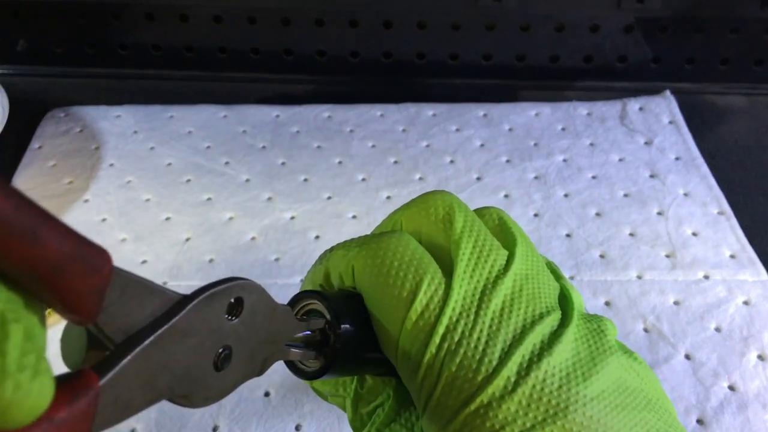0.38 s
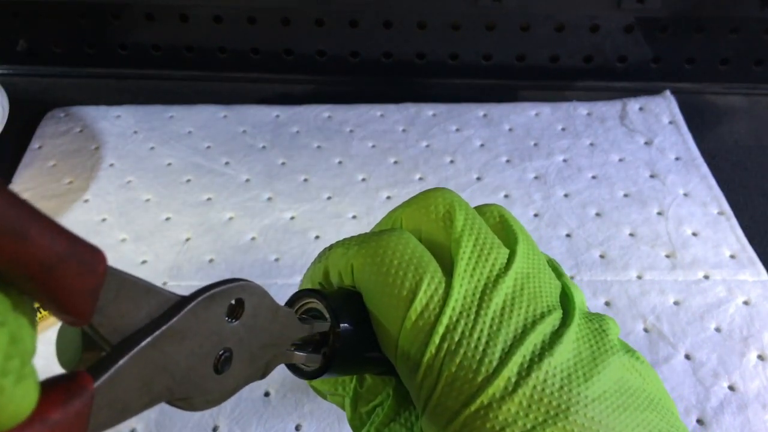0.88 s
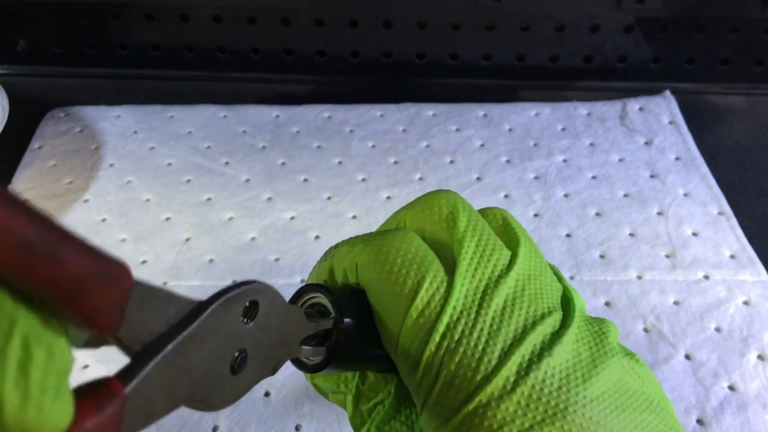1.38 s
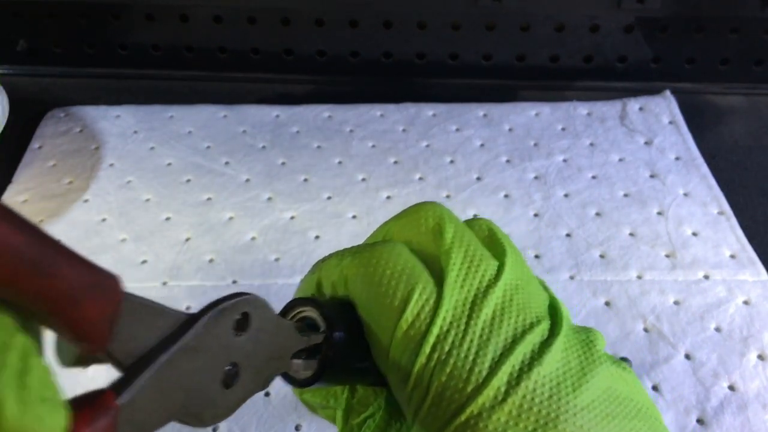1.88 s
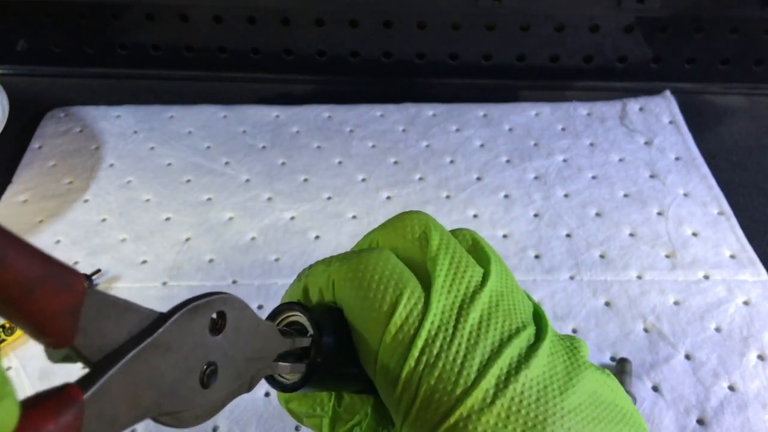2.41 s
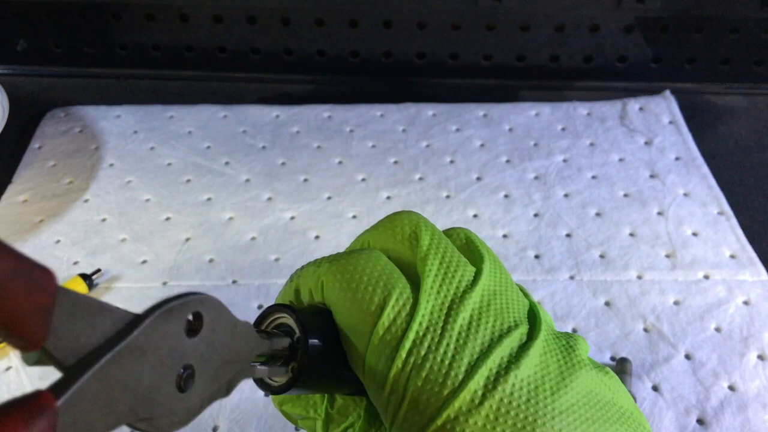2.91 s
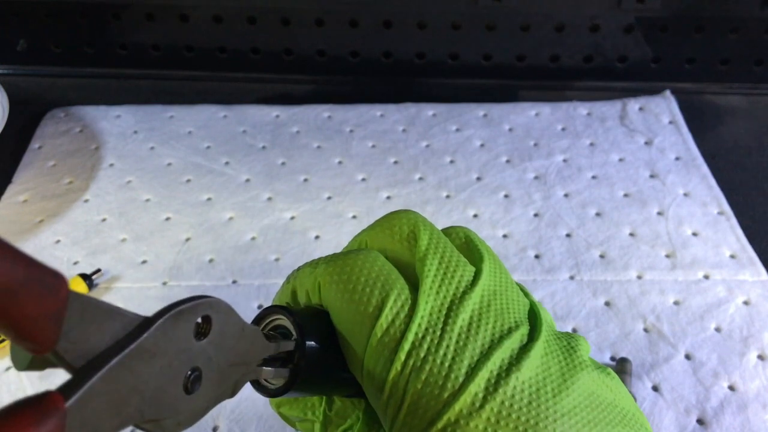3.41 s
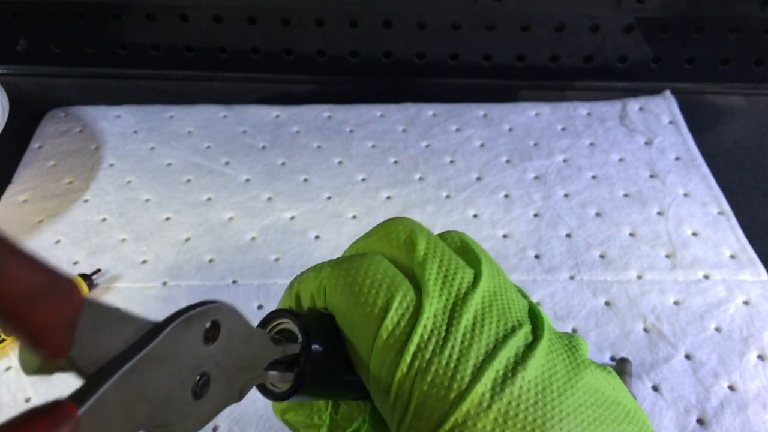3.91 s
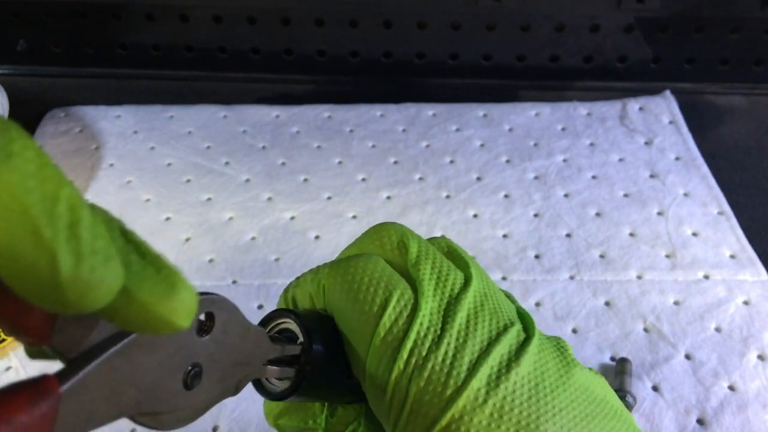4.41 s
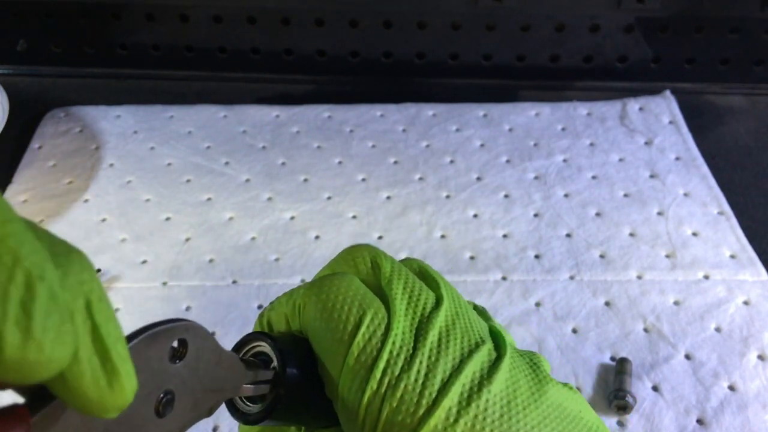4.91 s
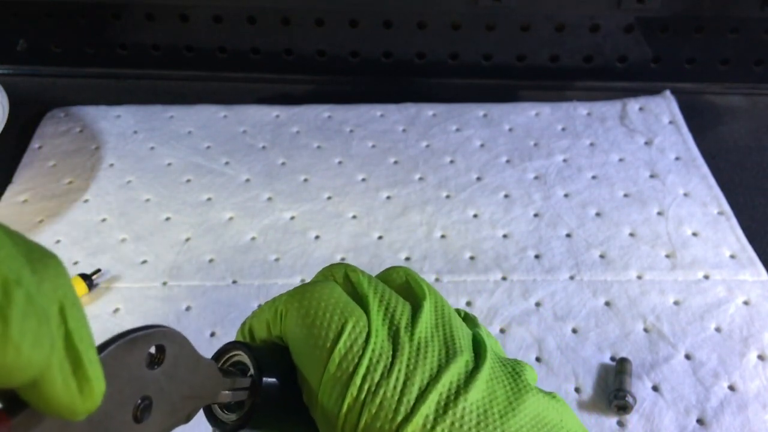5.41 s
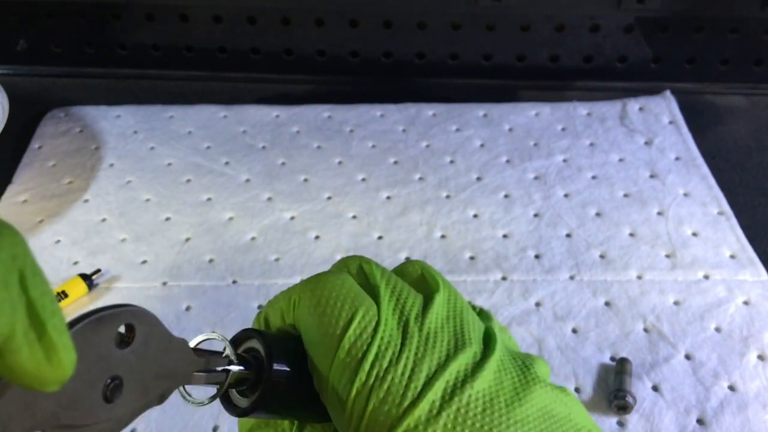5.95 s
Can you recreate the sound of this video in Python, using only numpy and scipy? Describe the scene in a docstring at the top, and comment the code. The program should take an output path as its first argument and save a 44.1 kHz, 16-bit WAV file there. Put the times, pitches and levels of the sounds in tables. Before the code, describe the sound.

Steel plier tips tick against a small housing over a steady workshop hum, gloves rustle, then a ring snaps loose with sharp metallic clicks.

```python
"""A workshop with a padded bench, heard by one close mono microphone.
Gloved hands work snap ring pliers into a small steel housing: steel modes die away as the tips tick and
the housing is knocked, and filtered noise and small cracks make the gloves rustle and creak.
At the end the ring slips its groove and springs out, scraping by way of grit that drives steel resonances.
Shaped noise and steady tones make the ventilation hum, a faint hiss and the whine of the lighting."""
import sys
import numpy as np
from scipy import signal
from scipy.fft import rfft, irfft
from scipy.io import wavfile
from scipy.ndimage import uniform_filter1d

SR = 44100
rng = np.random.default_rng(int(sys.argv[2]) if len(sys.argv) > 2 else 0)


def wav_out(sig):
    """Save sig, one row per channel (or a flat mono array), as 16-bit PCM at SR to the path in sys.argv[1]."""
    wavfile.write(sys.argv[1], SR, np.round(np.clip(np.atleast_2d(sig).T, -1, 1) * 32767).astype(np.int16))


def volts_from_decibels(level):
    """Turn decibel levels (scalar or array-like) into linear amplitude factors."""
    exponent = np.asarray(level, float) / 20
    return 10 ** exponent


N = 267242  # length in samples

SLIP_S, SPRING_S = 5.62195, 5.7741  # the ring slips its groove; it springs free
# spectrum of sliding rubber: (f/Hz, relative level per Hz/dB)
GLOVE_SPECTRUM = [(500, -15), (1000, -1), (1500, 0.5), (2400, 4), (4000, -4), (6500, 1.5), (9000, -3.5),
                  (13500, -15.5), (16500, -21)]
# spectrum of rubber letting go: (f/Hz, relative level per Hz/dB)
CRACK_SPECTRUM = [(1000, -30), (1900, 0), (2700, -6), (3400, 0), (4400, 1), (5000, -8), (8000, -14),
                  (12000, -10), (16500, -29)]
# spectrum of grit under sliding steel: (f/Hz, relative level per Hz/dB)
RASP_SPECTRUM = [(2000, -27), (3500, -15), (6000, -29), (7500, -13), (13000, -10), (14500, -24),
                 (16500, -27)]
SCRAPE_FADE_DB = -9.5  # at both ends of a slide of steel on steel


def evened(x):
    """Scales to rms 1."""
    return x / np.sqrt(np.mean(x ** 2) + 1e-20)


def read(points, hz):
    """Straight lines between points on a log-frequency axis."""
    f, value = np.transpose(points)
    return np.interp(np.log(hz + 1), np.log(f + 1), value)


def add(mix, s, sound):
    """Mixes a sound in at a time in seconds."""
    part = mix[round(s * SR):][:len(sound)]
    part += sound[:len(part)]


def coloured(x, points):
    """Filters by a spectrum in dB, then scales to rms 1."""
    gain_db = read(points, np.fft.rfftfreq(len(x), 1 / SR))
    return evened(irfft(rfft(x) * volts_from_decibels(gain_db), len(x)))


def tilted(x, slope_db, pivot_hz=6000):
    """Tilts the spectrum by a slope per octave, level below 1500 Hz."""
    hz = np.fft.rfftfreq(len(x), 1 / SR)
    octaves = np.log2(np.maximum(hz, 1500) / pivot_hz)
    return irfft(rfft(x) * volts_from_decibels(octaves * slope_db), len(x))


def resonate(x, hz, width):
    """The same two-pole resonance twice in series; width in Hz is that of each pass."""
    coefficients = signal.iirpeak(hz, hz / width, SR)
    return signal.lfilter(*coefficients, signal.lfilter(*coefficients, x))


def smoothed(x, size):
    """Two running means, leaving only slow drift."""
    return uniform_filter1d(uniform_filter1d(x, size=size), size=size)


def workshop():
    """Air and fans are shaped noise and narrow noise bands; motors and lighting are sine tones."""
    # fan rumble: (f/Hz, relative level per Hz/dB)
    rumble_spectrum = [(20, -40), (26, -6), (39, -20), (56, 1), (75, -0.5), (100, -2.5), (120, 1.5),
                       (132, -16), (146, -14.5), (170, -12.5), (195, -13), (235, -13), (360, -10.5),
                       (435, -26.5), (620, -54.5)]
    # air hiss: (f/Hz, relative level per Hz/dB)
    hiss_spectrum = [(250, -39), (420, -3.5), (622, -1), (842, -3), (1660, -8), (1960, -5.5), (2540, -12.5),
                     (4120, -17.5), (4800, -21), (6300, -23), (9400, -23.5), (10400, -30.5), (11200, -26),
                     (12500, -31), (16000, -36)]
    # fuzzy bands of the fans: (f/Hz, rms level/dB, width of each resonance pass/Hz)
    fan_bands = [(239, -68, 15.6), (223.2, -72.5, 22), (296.5, -72, 15.6), (337.8, -73.5, 14.3),
                 (170, -77, 12), (2040, -85, 74), (5280, -86, 240), (6300, -91, 120), (6490, -85.5, 330),
                 (115.1, -68, 13)]
    # motor tones, whose level wavers: (f/Hz, typical rms level/dB)
    motor_tones = [(29.5, -73.5), (58.3, -65.5), (120, -58), (240, -64), (264.3, -63.5), (358, -71),
                   (660, -81)]
    # thin steady tones of the lighting: (f/Hz, rms level/dB)
    light_tones = [(5443, -94), (5760, -85.5), (6120, -97)]
    waver_db = 2.5  # rms unsteadiness of the motor tones
    t = np.arange(N) / SR
    room = volts_from_decibels(-55) * coloured(rng.standard_normal(N), rumble_spectrum)
    room += volts_from_decibels(-66) * coloured(rng.standard_normal(N), hiss_spectrum)
    for hz, db, band_hz in fan_bands:
        room += volts_from_decibels(db) * evened(resonate(rng.standard_normal(N), hz, band_hz))
    for hz, db in motor_tones:
        waver = evened(smoothed(rng.standard_normal(N), 2000))
        tone = np.sqrt(2) * np.sin(2 * np.pi * (hz * t + rng.random()))
        room += volts_from_decibels(db + waver_db * waver) * tone
    for hz, db in light_tones:
        room += volts_from_decibels(db) * np.sqrt(2) * np.sin(2 * np.pi * hz * t)
    return room


def grit(count, per_s, spread_db):
    """Tiny catches at random moments and of either sign; a few are large."""
    caught = rng.random(count) < per_s / SR
    size = volts_from_decibels(spread_db * np.minimum(rng.exponential(1, count), 4))
    return caught * size * rng.choice([-1, 1], count)


def fidget():
    """Faint stray cracks of the gloves all along."""
    return volts_from_decibels(-89) * coloured(grit(N, 40, 2.5), GLOVE_SPECTRUM)


def rings(modes, cycles, detune=1):
    """One dying sine a mode, as rows, losing 60 dB in that many cycles; neighbours start opposed."""
    hz, db = (c[:, None] for c in np.transpose(modes))
    turns = hz * detune * np.arange(2048) / SR
    sign = (-1.) ** np.arange(len(hz))[:, None]
    return sign * volts_from_decibels(db - 60 * turns / cycles) * np.sin(2 * np.pi * turns)


def contact_onset(rise_s):
    """A contact takes a moment: an exponential rise with this time constant."""
    return 1 - np.exp(-np.arange(2048) / (rise_s * SR))


def strike(table, modes, cycles, weigh, shift):
    """Rings the modes once a row; the grip shifts them a little each time."""
    out, hz = np.zeros(N), np.transpose(modes)[0]
    onset = contact_onset(.00006)
    for s, db, *where in table:
        grip, uneven = rng.standard_normal((2, len(modes), 1))
        blow = volts_from_decibels((db - weigh(hz, *where))[:, None] + 1.4 * uneven)
        add(out, s, onset * (blow * rings(modes, cycles, 1 + shift * grip)).sum(0))
    return out


def clicks():
    """Each contact rings the pliers at another spot; thin tips radiate no bass."""
    # steel tips on steel: (t/s, blow to the pliers/dB, struck spot/octaves above spot_hz,
    # fall away from that spot/about dB per octave, sign ignored)
    contacts = [(.0162, -40.5, 0, 8.5), (.0282, -55.5, 3, 1), (.0306, -51.5, 0.5, 9), (.0345, -61, 2, 4),
                (.0522, -54.5, 0, 18.5), (.293, -63, .1, 2), (.7228, -62, 0.52, 12), (.7248, -63, -1, 12),
                (.7324, -58, 1.1, 15), (.7368, -56, 0.5, 16), (.7388, -60, .4, 14), (.7478, -69, 2, 10),
                (1.3158, -63.5, 0.26, 12), (1.482, -67, 1.4, 6), (1.5114, -61, 1.3, 9),
                (1.9334, -61, 1.5, 17), (1.9415, -63, 0.5, 8), (2.0352, -47, 0.3, 17),
                (2.0384, -44.5, 0.6, 22), (2.0411, -51, 2, 16), (2.1669, -66, 2, 5), (2.1735, -61, 1.5, 14),
                (2.1995, -67, 2, 4), (2.2728, -63.5, 1.25, 17), (2.2968, -67, 0.7, 7),
                (2.8103, -62, 0.7, 8), (2.8167, -58, 1.7, 27), (3.1015, -46.5, 1.3, 16),
                (3.1333, -59, 1.5, 13), (3.1387, -44.5, 0.7, 21), (3.2406, -56.5, 0.65, 16),
                (3.2465, -51, 0.9, 20), (3.2545, -69, 2, 25), (3.2829, -64, 0.5, 14), (3.2935, -68, 2, 20),
                (3.4212, -66.5, 1.5, 6), (3.7365, -52.5, 0.98, 15), (3.7692, -67, 1, 12),
                (3.8537, -63, 1.5, 15), (3.9708, -67, 1, 11), (4.1598, -55, 0.3, 11),
                (4.2816, -58, 0.2, 20), (4.5238, -42, 0.45, 17), (4.997, -68, 2.3, 14), (5.048, -74, 3, 12),
                (4.756, -67, 0.4, 20), (4.882, -69, 1, 25), (5.066, -70, 1.4, 12), (5.0789, -67, 0, 9),
                (5.367, -68, 1.3, 22), (5.4342, -68, 2, 10), (5.5984, -68, 0.5, 14), (5.6211, -42, 1, 10),
                (SLIP_S, -31, .9, 14), (5.6255, -36, 1.1, 10), (5.6285, -38.5, 3, -4.5),
                (5.6358, -47, 2, 7), (5.7683, -42, 1.3, 6), (SPRING_S, -30, 1.2, 20), (5.7776, -36, 1, 12),
                (5.7954, -47.5, 0.8, 9), (5.8154, -56, 2, 30), (5.8234, -33, 0.96, 34),
                (5.831, -54, 1.2, 10), (5.836, -61, 1.5, 6), (5.8876, -46, 1.4, 11), (5.8941, -48, 1.5, 16)]
    # what the pliers ring with: (f/Hz, relative level/dB)
    plier_modes = [(2800, 1.5), (3200, 2), (3700, 6.5), (4300, 2.5), (5100, 4), (5600, 6.5), (6250, 8),
                   (6850, 3.5), (7900, 8.5), (8300, 8.5), (8900, 7), (9700, 4.5), (11200, 12), (12400, 3),
                   (13400, 8), (15000, -2)]
    spot_hz, shoulder = 3400, 1.04  # the shoulder exponent rounds the top of the fall

    def weigh(hz, spot, fall_db):
        away = abs(np.log2(hz / spot_hz) - spot)
        return abs(fall_db) * away ** shoulder

    ticks = strike(contacts, plier_modes, 34, weigh, .014)  # 34 swings to lose 60 dB, hand-held
    return signal.sosfilt(signal.butter(4, 2500, "high", fs=SR, output="sos"), ticks)


def knocks():
    """The housing answers with the modes near the struck wall's pitch."""
    # the housing is knocked: (t/s, blow level/dB, f around which its modes answer/Hz)
    blows = [(.0162, -51, 1300), (.0306, -56, 1200), (.0345, -59, 1210), (.0522, -55, 1100),
             (.293, -55, 1500), (.7228, -56, 1900), (.7324, -46, 1130), (.7368, -54, 1150),
             (2.0352, -61, 2600), (2.0384, -59, 2300), (2.2968, -55, 1700), (3.1015, -61, 2000),
             (3.1387, -50.5, 1260), (3.2465, -60, 1500), (3.4235, -48.5, 1450), (3.7365, -62, 2000),
             (4.1598, -44, 2500), (4.5238, -48, 2000), (5.367, -63, 2000), (5.6217, -42, 1300),
             (5.6255, -50, 2000), (5.6285, -39, 2360), (5.6358, -48, 3000), (5.7683, -39, 2900),
             (5.774, -48, 2000), (5.7774, -38.5, 3000), (5.7954, -45, 2600), (5.8234, -43.5, 3100),
             (5.8876, -45.5, 2900), (5.8941, -47, 3200)]
    # what the housing rings with: (f/Hz, relative level/dB)
    housing_modes = [(260, -4), (520, 0.5), (700, -3), (900, -1), (1200, 2), (1500, 0.5), (1950, 2),
                     (2450, -0.5), (3200, 3)]

    def weigh(hz, near_hz):
        return 10 * abs(np.log2(hz / near_hz))  # dB lost, 10 per octave away from that pitch

    return strike(blows, housing_modes, 17, weigh, 0.055)  # 17 swings to lose 60 dB, hand-held


def pings():
    """A single dying sine each: high ones are steel singing out, low ones the body of a knock."""
    # (t/s, starting level ahead of the onset and high-pass/dB, f/Hz, time to lose 60 dB/s)
    dying_tones = [(0.0164, -33.5, 5640, .009), (.0282, -50, 5940, .008), (.7228, -58, 5550, .012),
                   (2.0386, -39, 5840, .008), (3.1015, -42, 5500, 0.01), (3.1015, -43, 6100, 0.0088),
                   (3.1015, -44, 11200, .005), (3.2465, -55, 1570, .03), (4.1598, -42.5, 3300, 0.013),
                   (4.5238, -43, 5130, .013), (4.5238, -42, 3100, .005), (4.5242, -37, 9400, 0.0037),
                   (SLIP_S, -20, 4330, .009), (SLIP_S, -18, 6100, .005), (SLIP_S, -21, 11400, .004),
                   (SLIP_S, -12.5, 8300, .005), (5.6257, -27, 8000, .007), (5.6257, -33, 13200, .006),
                   (5.622, -39, 201, 0.056), (5.775, -50, 200, 0.051), (5.7742, -40, 1090, 0.004),
                   (SPRING_S, -27, 10900, .006), (.0282, -46, 14500, .004), (.7232, -58, 3700, .015),
                   (.7236, -59, 8000, .018), (.7368, -58, 3700, .015), (0.736, -53, 5630, .014),
                   (.7326, -62, 11000, .01), (3.1333, -61, 11400, .008), (3.1333, -60, 8000, .01),
                   (3.2465, -55, 8000, .015), (3.2465, -61, 11500, .012), (3.2465, -59, 5600, 0.017),
                   (3.2829, -58, 8800, .008), (3.2829, -63, 4000, .01), (5.7954, -50, 3600, .012),
                   (5.8, -54, 5170, .015), (5.8238, -44, 3300, 0.011), (5.8242, -35, 6000, 0.0072),
                   (4.5238, -43, 2470, 0.0055), (5.768, -45, 3100, 0.017), (SPRING_S, -20, 13400, .008),
                   (SPRING_S, -9.5, 8140, .006), (SPRING_S, -21, 6900, .006), (5.7776, -21, 8300, .006),
                   (5.7838, -38, 8000, .008), (5.773, -36, 3430, 0.0088), (5.7954, -46, 9450, .005),
                   (5.824, -26.5, 8350, 0.0073), (5.8876, -43, 3530, .01)]
    out, onset = np.zeros(N), contact_onset(.00009)
    for s, db, hz, t60 in dying_tones:
        tone = onset * rings([(hz, db)], hz * t60)[0]
        # the high-pass leaves no thump below the tone
        add(out, s, signal.lfilter(*signal.butter(2, hz / 2, "high", fs=SR), tone))
    return out


def stroke(length, db, peak, fade_db):
    """Gain of one movement: swells to its peak, then dies away."""
    u, peak = np.arange(0, length, 1 / SR) / length, np.clip(peak, .02, .98)
    away = np.where(u < peak, (peak - u) / peak, (u - peak) / (1 - peak))
    wobble_db = 1.55 * evened(smoothed(rng.standard_normal(len(u)), 300))  # the hand is never steady
    ends = np.minimum(1, np.minimum(u, 1 - u) * length * 400)  # 2.5 ms ramps
    return volts_from_decibels(db + fade_db * away ** 1.6 + wobble_db) * ends


def rubs():
    """Rubber slides with a hiss and lets go in small cracks."""
    # the gloves slide: (start t/s, length/s, level at the peak ahead of the hiss tilt/dB,
    # place of the peak/0-1, brightness of the hiss/dB per octave)
    glove_moves = [(.284, .02, -63, .4, -5), (1.3, .045, -68, 0.3, 7), (1.475, 0.051, -64.5, .5, 6),
                   (1.765, 0.037, -69.5, 0.5, 2), (1.8, 0.1, -70, 0.6, 0), (1.89, 0.1, -62, 0.46, 1),
                   (1.99, 0.055, -63.5, 0.4, 2), (2.025, 0.03, -55, 0.3, 2), (2.12, 0.096, -66.5, 0.5, 0),
                   (2.215, 0.069, -66, 0.1, -1), (2.8, 0.021, -66.5, .55, 6), (3.245, 0.096, -76, 0.25, 2),
                   (3.362, 0.08, -67, 0.04, 8.5), (3.415, 0.038, -66, .2, -1), (3.5, 0.13, -71, .7, 0),
                   (3.59, 0.14, -64.5, 0.16, 0.5), (3.71, .045, -58.5, .68, 6), (3.76, .07, -76, .5, 0),
                   (3.82, 0.121, -62, 0.96, 1.5), (3.985, 0.037, -58.5, .45, 0.5),
                   (4.01, 0.083, -56.5, .45, 5), (4.08, 0.091, -73, .4, -5), (3.94, .055, -71, 0.5, -5.5),
                   (4.145, 0.052, -57, 0.5, 2.5), (4.17, 0.11, -61.5, 0.68, -1),
                   (4.26, 0.26, -72.5, 0.34, -3), (5.04, 0.17, -73, .4, 0), (5.84, .1, -68, .3, 2),
                   (5.94, 0.18, -68, 0.47, 4)]
    crackle = 0.25  # share of the power in small cracks 0-1, ahead of the hiss tilt
    out = np.zeros(N)
    for s, length, db, peak, slope_db in glove_moves:
        gain = stroke(length, db, peak, -11)
        hiss = tilted(coloured(rng.standard_normal(len(gain)), GLOVE_SPECTRUM), slope_db)
        cracks = coloured(grit(len(gain), 810, 2.2), CRACK_SPECTRUM)
        add(out, s, gain * (np.sqrt(1 - crackle) * hiss + np.sqrt(crackle) * cracks))
    return out


def sing(drive, modes):
    """Friction heard through a set of resonances, neighbours opposed, scaled to rms 1."""
    out = np.zeros(len(drive))
    for k, (hz, mode_hz, db) in enumerate(modes):
        # two passes 1.7 times as wide come out about as wide as the mode
        out += (-1) ** k * volts_from_decibels(db) * resonate(drive, hz, 1.7 * mode_hz)
    return evened(out)


def slides():
    """The tips slide over steel and sing: fine grit drives their modes."""
    # (start t/s, length/s, level of the singing at the peak/dB, place of the peak/0-1)
    tip_moves = [(.565, .027, -75, .6), (3.172, 0.023, -75, .6), (3.198, 0.027, -66, 0.2),
                 (3.256, 0.018, -73, .4), (5.785, .032, -64, .6)]
    # the tips under friction: (f/Hz, approximate width/Hz, relative level/dB)
    tip_modes = [(3700, 300, -6), (5600, 260, 2), (6300, 300, -7), (7700, 220, 0), (8800, 400, -6),
                 (11200, 350, -1)]
    out = np.zeros(N)
    for s, length, db, peak in tip_moves:
        gain = stroke(length, db, peak, SCRAPE_FADE_DB)
        drive = grit(len(gain), 2500, 3.1)
        add(out, s, gain * (sing(drive, tip_modes) + 0.27 * coloured(drive, RASP_SPECTRUM)))
    return out


def scrapes():
    """Fine grit drives modes of the scraped steel; the bare rasp fills in between them."""
    # steel scrapes on steel, the pliers faintly at first, the ring at the end: (start t/s, length/s,
    # level at the peak/dB, place of the peak/0-1, f around which the modes answer/Hz)
    steel_moves = [(.84, .047, -66, .77, 11500), (5.654, 0.023, -47, .15, 9500),
                   (5.674, .025, -51, .3, 7600), (5.696, .026, -63, .5, 8000),
                   (5.718, .021, -59, .4, 11000), (5.726, .028, -50, .8, 7600),
                   (5.742, 0.0066, -50, .5, 9500), (5.748, 0.013, -43.5, .5, 7700),
                   (5.758, 0.012, -43, .6, 8800), (5.802, .018, -59, .7, 8500), (5.836, .05, -72, .2, 6500),
                   (5.9, .03, -66, 0.6, 9000), (5.922, 0.03, -55, .8, 10500)]
    # steel under friction: (f/Hz, approximate width/Hz, relative level/dB)
    steel_modes = [(3560, 70, 2), (3850, 150, 1), (4850, 440, -4), (6400, 570, -2), (7210, 160, 4),
                   (7800, 200, 6), (8800, 210, 4.5), (9900, 250, 6), (10800, 460, -11), (11800, 500, -3),
                   (13000, 400, -8)]
    out = np.zeros(N)
    for s, length, db, peak, near_hz in steel_moves:
        gain = stroke(length, db, peak, SCRAPE_FADE_DB)
        squeeze = 1 + .008 * rng.standard_normal(len(steel_modes))  # shifts each mode
        drive = grit(len(gain), 6500, 3.8)
        # modes lose 7 dB per octave away from the pitch of this scrape
        modes = [(hz * shift, mode_hz, mode_db - 7 * abs(np.log2(hz / near_hz)))
                 for (hz, mode_hz, mode_db), shift in zip(steel_modes, squeeze)]
        add(out, s, gain * evened(sing(drive, modes) + .38 * coloured(drive, RASP_SPECTRUM)))
    return out


def creaks():
    """Rubber sticks and slips on the handle: an uneven row of slips, each a crack of rubber."""
    # (start t/s, length/s, level at the peak ahead of the tilt/dB, approximate slips per s)
    grips = [(3.87, .085, -61, 190), (4.2, .22, -65.5, 130)]
    out = np.zeros(N)
    smear = volts_from_decibels(-60 * np.arange(400) / SR / .011)  # one slip loses 60 dB in 11 ms
    for s, length, db, per_s in grips:
        gain = stroke(length, db, 0.44, -6)
        gap, size = rng.standard_normal((100, 2)).T
        at = (np.cumsum(np.exp(.3 * gap)) * SR / per_s).astype(int)
        inside = at < len(gain)
        slips = np.zeros(len(gain))
        slips[at[inside]] = volts_from_decibels(1.5 * size)[inside]  # sizes spread by 1.5 dB
        slips = signal.fftconvolve(slips, smear)[:len(gain)] * rng.standard_normal(len(gain))
        rubber = evened(slips) + .65 * rng.standard_normal(len(gain))  # hiss between the slips
        add(out, s, gain * tilted(coloured(rubber, CRACK_SPECTRUM), -5, pivot_hz=4000))
    return out


def bench(x):
    """A few close echoes, then a short diffuse tail of dying noise."""
    # off the bench and its back panel: (delay t/s, level against the direct sound/dB)
    reflections = [(.0026, -17.5), (.0049, -21.5), (.0071, -27)]
    t = np.arange(6000) / SR
    fall = volts_from_decibels(-60 * t / .032) + volts_from_decibels(-19.0 - 60 * t / 0.22)  # a fast and a slow decay
    tail = rng.standard_normal(len(t)) * fall * (t > .0015)
    answer = volts_from_decibels(-14.5) * tail / np.linalg.norm(tail)  # tail energy against the direct sound
    answer[0] = 1
    for s, db in reflections:
        answer[round(s * SR)] += volts_from_decibels(db)
    return signal.oaconvolve(x, answer)[:N]


def scene():
    """Hands and tool on the bench, in the hum of the workshop."""
    room = workshop()
    hands = fidget() + clicks() + knocks() + pings() + rubs() + slides() + scrapes() + creaks()
    return (bench(hands) + room)[None]


def band_limit(x):
    """A steep low-pass at the top of the band."""
    return signal.sosfilt(signal.butter(12, 16810, fs=SR, output="sos"), x)


def record(dry):
    """The top of the band falls away steeply, to 15 dB down above 15850 Hz."""
    lowpass = signal.firwin(401, 15850, window=("kaiser", 6), fs=SR)
    low = signal.oaconvolve(dry, lowpass[None], "same")
    return band_limit(low + volts_from_decibels(-15) * (dry - low))


dry = scene()
out = record(dry)
wav_out(out)
```